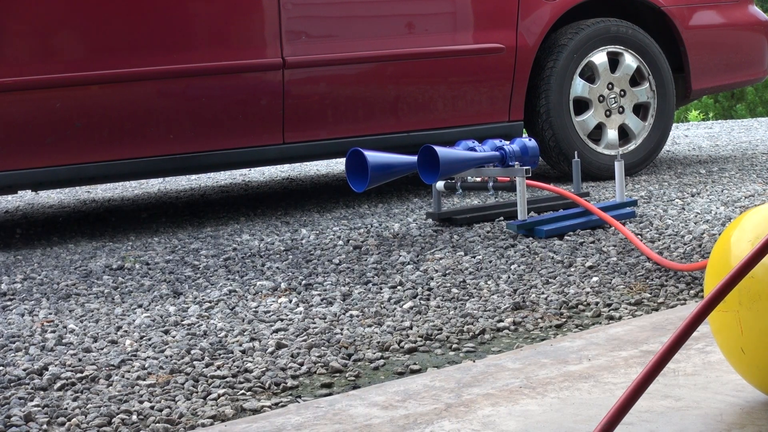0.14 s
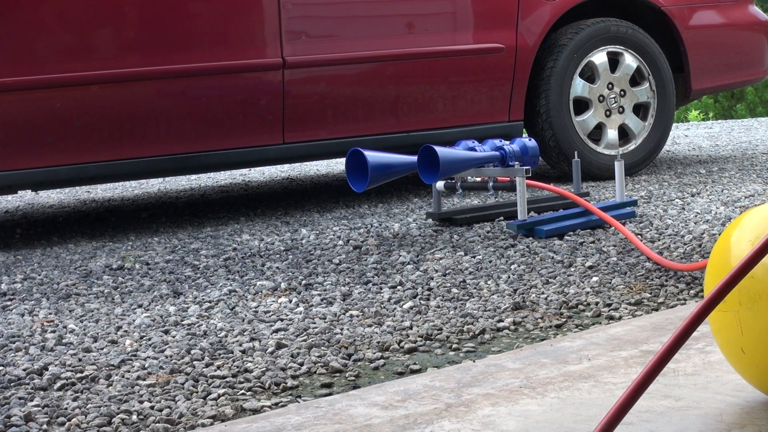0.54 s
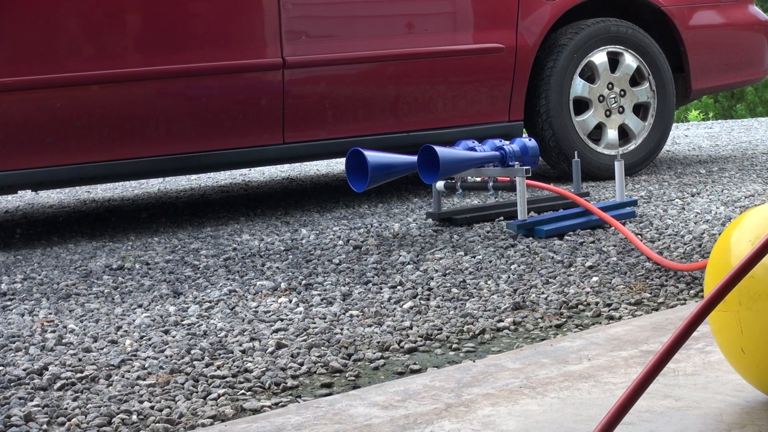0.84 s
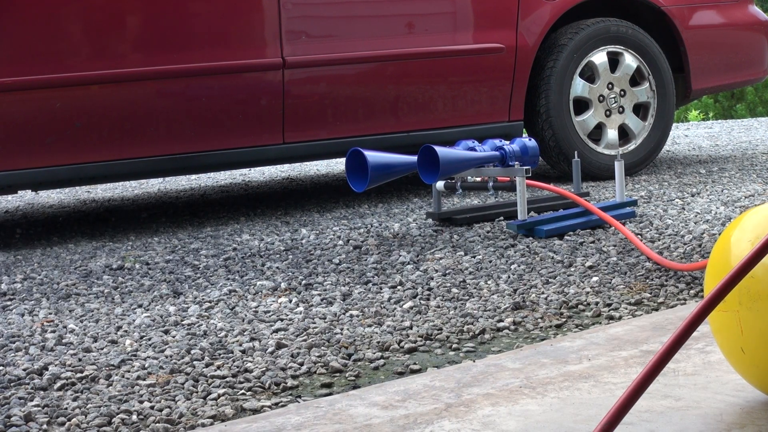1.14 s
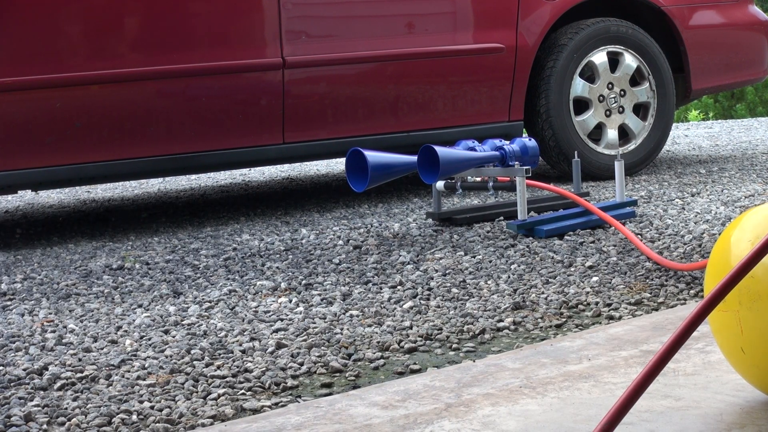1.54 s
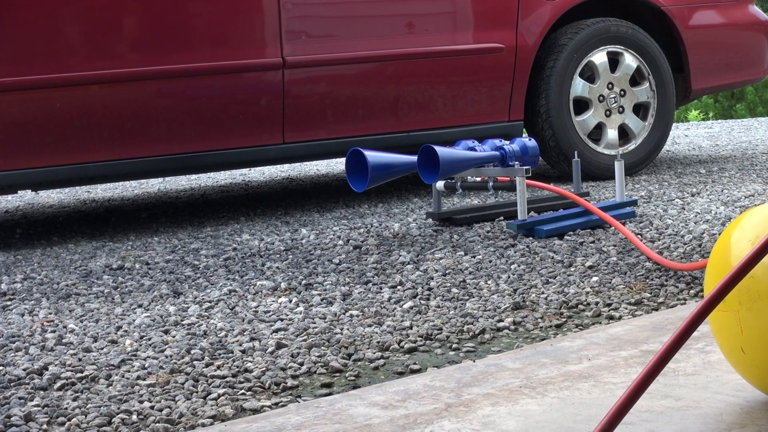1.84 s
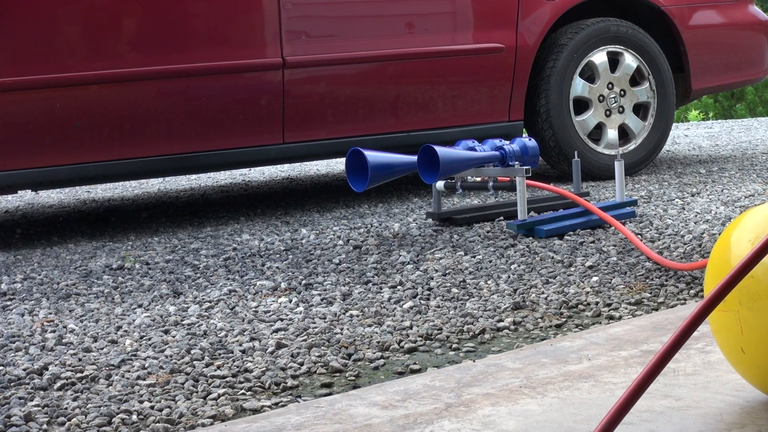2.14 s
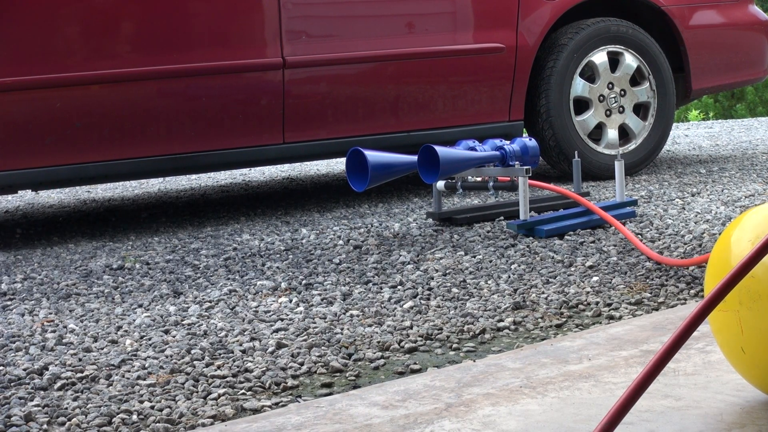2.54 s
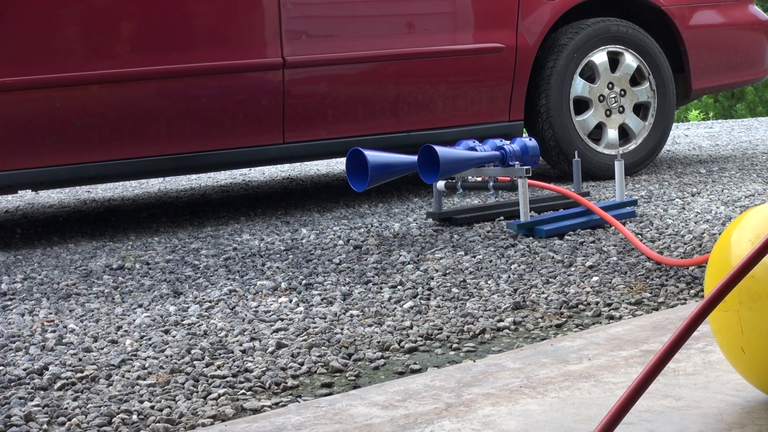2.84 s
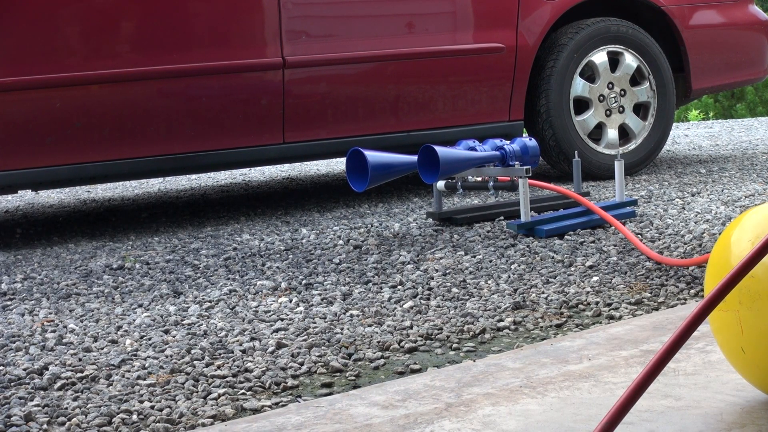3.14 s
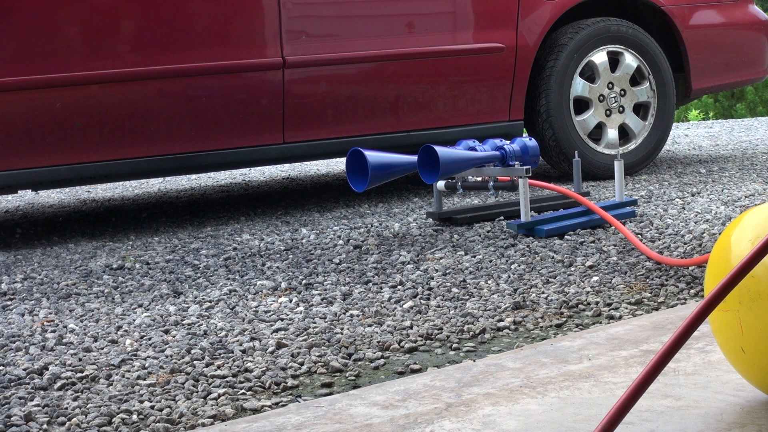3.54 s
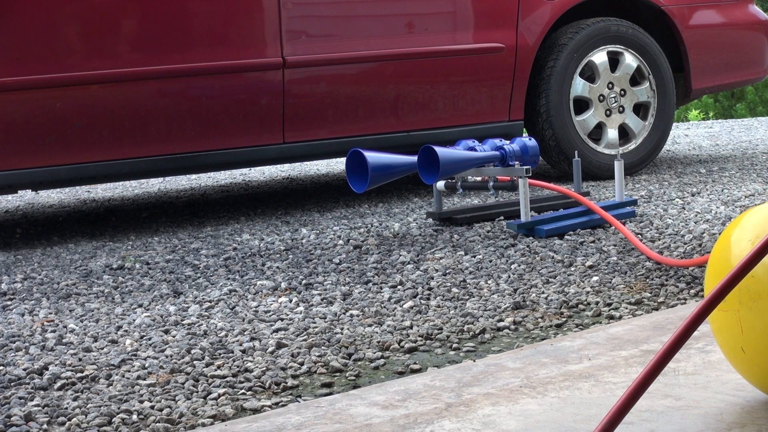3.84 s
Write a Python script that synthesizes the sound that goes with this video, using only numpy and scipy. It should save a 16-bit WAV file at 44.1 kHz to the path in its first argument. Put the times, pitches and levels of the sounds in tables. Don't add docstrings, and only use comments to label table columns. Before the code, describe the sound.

A very loud compressed-air horn bursts out after near silence outdoors, cut off at the end

```python
import sys
import numpy as np
from scipy import signal
from scipy.io import wavfile

SR = 44100
rng = np.random.default_rng(int(sys.argv[2]) if len(sys.argv) > 2 else 0)


def convert_level_to_amplitude(level_db):
    exponent = np.asarray(level_db, float) / 20
    return 10 ** exponent


def store_wav(level_fs):
    pcm = np.round(np.clip(np.atleast_2d(level_fs), -1, 1) * 32767)
    wavfile.write(sys.argv[1], SR, pcm.T.astype(np.int16))


N = 176400


def rms_one(x):
    return x / np.sqrt(np.mean(x ** 2) + 1e-20)


def in_time(rows):
    t_s, *columns = np.transpose(rows)
    return [np.interp(np.arange(N) / SR, t_s, c) for c in columns]


def drift(rate_hz):
    r = np.exp(-80 * np.pi * rate_hz / SR)
    slow = signal.lfilter([1], [1, -2 * r, r * r], rng.standard_normal(N // 40 + 2002))[2000:]
    return np.interp(np.arange(N) / 40, np.arange(len(slow)), rms_one(slow))


def band(x, low_hz, high_hz):
    return signal.sosfilt(signal.butter(2, [low_hz, high_hz], "band", fs=SR, output="sos"), x)


def resonance(x, hz, width_hz):
    r = np.exp(-np.pi * width_hz / SR)
    poles = [1, -2 * r * np.cos(2 * np.pi * hz / SR), r * r]
    return signal.lfilter([(1 - r * r) / 2, 0, (r * r - 1) / 2], poles, x)


def resonant_noise(white, peaks):
    return sum(convert_level_to_amplitude(db) * rms_one(resonance(white, hz, width_hz)) for hz, width_hz, db in peaks)


def coloured(spectrum, patchy_db):
    out = 0
    edges_hz = 23 * 2 ** np.arange(0, 9.7, .5)
    white = rng.standard_normal((2, N))
    hz, db = np.transpose(spectrum)
    for k, (low, high) in enumerate(zip(edges_hz, edges_hz[1:])):
        level_db = np.interp(np.log(low * high) / 2, np.log(hz), db)
        out = out + convert_level_to_amplitude(level_db + patchy_db * drift(8.5)) * band(white[k % 2], low, high)
    return rms_one(out)


# f/Hz, level/dB
TRAFFIC = [(25, -30), (70, -10), (119, -7.5), (210, -12.5), (478, -29), (549, -28), (881, -28.5),
           (985, -33), (4550, -47), (15500, -48)]


def traffic():
    return convert_level_to_amplitude(-56.5) * coloured(TRAFFIC, patchy_db=0.9)


def insect():
    t = np.arange(N) / SR
    beat_hz, swell_db_per_s = 45, 1
    throb = convert_level_to_amplitude(1.5 * drift(4) + swell_db_per_s * t) * (1 + .4 * np.sin(2 * np.pi * beat_hz * t))
    return convert_level_to_amplitude(-83) * throb * rms_one(resonance(rng.standard_normal(N), 4620, 260))


def whine():
    return convert_level_to_amplitude(-97) * np.sin(2 * np.pi * 14200 * np.arange(N) / SR)


# t/s, length/s, level/dB
RUSTLES = [(0.14, 0.093, -68), (0.276, 0.044, -66.5), (0.296, 0.31, -64.5), (0.648, 0.11, -64),
           (0.704, 0.067, -64.5), (0.764, 0.133, -71), (1.175, .03, -73), (1.25, .14, -73)]


def rustles():
    t = np.arange(N) / SR
    grains_per_s = 12000
    hits = rng.random(N) < grains_per_s / SR
    grains = hits * convert_level_to_amplitude(1.84 * rng.exponential(1, N)) * rng.choice([-1, 1], N)
    stroke = 0
    for s, length_s, db in RUSTLES:
        progress = np.clip((t - s) / length_s, 0, .999)
        stroke = stroke + convert_level_to_amplitude(db) * np.sin(np.pi * progress ** 0.76) ** 0.84
    texture = rms_one(band(grains, 1200, 5800)) + convert_level_to_amplitude(-12) * rms_one(band(grains, 5000, 16500))
    return stroke * convert_level_to_amplitude(1.1 * drift(20)) * texture


# t/s, length/s, level/dB, low f/Hz, high f/Hz
PUFFS = [
    (1.195, .03, -57, 260, 520),
    (1.18, .06, -70, 600, 3200),
    (1.912, .06, -49, 180, 620),
    (.283, .012, -70, 3000, 12000),
]


def valve_puffs():
    t, white = np.arange(N) / SR, rng.standard_normal(N)
    out = np.zeros(N)
    for s, length_s, db, low_hz, high_hz in PUFFS:
        swell = np.sin(np.pi * np.clip((t - s) / length_s, 0, 1) ** 0.86)
        out += convert_level_to_amplitude(db) * swell * rms_one(band(white, low_hz, high_hz))
    return out


# t/s, level/dB
BUMPS = [(.34, -51), (.375, -43), (.43, -42)]


def bumps():
    t = np.arange(N) / SR
    out = np.zeros(N)
    for s, db in BUMPS:
        out += convert_level_to_amplitude(db) * np.exp(-((t - s) / 0.017) ** 2) * np.sin(2 * np.pi * 55 * (t - s))
    return out


# t/s, length/s, f/Hz, level/dB
RING_UPS = [(2.068, .018, 655, -30), (2.098, .02, 1400, -34), (2.038, .01, 1150, -39),
            (2.075, .015, 1160, -39), (1.965, .015, 3800, -55), (1.93, .012, 2500, -61),
            (.57, .06, 2500, -80)]


def ring_ups():
    t = np.arange(N) / SR
    out = np.zeros(N)
    for s, length_s, hz, db in RING_UPS:
        out += convert_level_to_amplitude(db) * np.exp(-((t - s) / length_s) ** 2) * np.sin(2 * np.pi * hz * t)
    return out


# f/Hz, level/dB, t60/s
TAP = [(404, -61, .15), (662.5, -63, .25), (1320, -66, .15), (1780, -64, 0.42), (2550, -80.5, .15),
       (3400, -78, 0.1)]


def tap():
    since_s = np.maximum(np.arange(N) / SR - 1.183, 0)
    return sum(convert_level_to_amplitude(db - 60 * since_s / t60_s) * np.sin(2 * np.pi * hz * since_s) for hz, db, t60_s in TAP)


CHIRPS = [1.345, 1.385, 1.43]


def bird():
    t = np.arange(N) / SR
    tweet = sum(np.exp(-((t - s) / .012) ** 2) for s in CHIRPS)
    return convert_level_to_amplitude(-76.5) * tweet * rms_one(band(rng.standard_normal(N), 6550, 7150))


# t/s, level/dB, jet f/Hz
AIR = [(1.908, -85, 3880), (1.922, -53, 3820), (1.98, -47.5, 3700), (2.02, -44.5, 2870),
       (2.07, -34.5, 2860), (2.1, -37, 2640), (2.14, -46, 2600), (2.2, -46, 2600), (3.74, -38, 2600),
       (3.88, -67, 2600)]
# f/Hz, level/dB
AIR_COLOUR = [(250, -28), (380, -4), (540, -14), (700, -27), (1900, -13), (3800, -10), (9000, -16),
              (15500, -14.5)]
# f/Hz, width/Hz, level/dB
PIPES = [(637, 47, 4), (833, 26, 3), (1152, 30, 0.5), (1400, 21, -5), (2040, 82, -1.5)]
# f/Hz, width/Hz, level/dB
LEAKS = [(2500, 150, -11), (3706, 380, -5), (6400, 350, -7)]


def air():
    db, jet_hz = in_time(AIR)
    jet_width_hz = 810
    slow = signal.lfilter(*signal.butter(2, jet_width_hz / SR), rng.standard_normal((2, N)))
    turn = 2 * np.pi * np.cumsum(jet_hz) / SR
    jet = rms_one(slow[0] * np.cos(turn) + slow[1] * np.sin(turn))
    white = rng.standard_normal(N)
    pipes = rms_one(resonant_noise(white, PIPES))
    filled = np.clip((np.arange(N) / SR - 1.99) / 0.011, 0, 1)
    hiss = coloured(AIR_COLOUR, patchy_db=1.5)
    hiss = hiss + (1 - 0.44 * filled) * resonant_noise(white, LEAKS)
    hiss = hiss + filled * (convert_level_to_amplitude(6) * jet + convert_level_to_amplitude(5.5) * pipes)
    return hiss * convert_level_to_amplitude(db) * (np.arange(N) > AIR[0][0] * SR)


def overtone_db(table, k, beyond_db):
    return table[min(k, len(table) - 1)] + beyond_db * max(k - len(table) + 1, 0)


RASP_SHARE_DB = [0, -3, -7.5, -7.5]


def bell(drive, full_db, half_db, rasp_db, beyond_db=0, flutter_db=0.53, count=24):
    mute_db, waver_share, phase_spread_rad = 36.5, 0.000591, 0.75
    hz, db, brass = in_time(drive)
    a = int(drive[0][0] * SR)
    turn = 2 * np.pi * np.cumsum(hz * (1 + waver_share * drift(15.2)))[a:] / SR
    opened = np.clip(2 * brass[a:] - 1, 0, 1)
    muted = np.clip(1 - 2 * brass[a:], 0, 1)
    out = np.zeros(N)
    for k, phase in enumerate(phase_spread_rad * rng.standard_normal(count)):
        level_db = opened * overtone_db(full_db, k, beyond_db)
        level_db = level_db + (1 - opened) * overtone_db(half_db, k, -1.5) - mute_db * muted * (k > 0)
        tone = np.sin((k + 1) * turn + phase) * np.sqrt(2)
        out[a:] += convert_level_to_amplitude(level_db + flutter_db * drift(7.8)[a:]) * tone
    puff_db = -28 + rasp_db - 24.9 * (0.5 - opened) - mute_db * muted
    puff = (1 + np.cos(turn)) ** 3 / 2 * convert_level_to_amplitude(puff_db)
    out[a:] += puff * rms_one(band(rng.standard_normal(N), 670, 7500))[a:]
    return out * convert_level_to_amplitude(db)


# t/s, f/Hz, level/dB, brassiness/0-1
HIGH = [(1.97, 381, -69, .05), (2.03, 371.8, -34, 0.2), (2.095, 377.3, -6.5, 0.24), (2.135, 375.2, 0, 0.33),
        (2.18, 376.5, 8.5, 0.57), (2.385, 375.9, 10, 0.55), (2.42, 376.8, 17.5, 0.9),
        (2.66, 372.9, 17.5, 0.96), (3.7, 372.3, 17.5, 0.97), (3.75, 372.5, 14, 0.55),
        (3.83, 374.3, 9, 0.38), (3.885, 373.8, 0.5, 0.49), (3.92, 368.5, -12, 0.4), (4.0, 370, -52, .8)]
HIGH_FULL_DB = [-0.5, -2, -19, -36, -31, -13.5, -13.5, -7, -10.5, -16.5, -22, -59]
HIGH_HALF_DB = [0, -6, -17.5, -62, -28, -32.5]


def high_bell():
    return bell(HIGH, HIGH_FULL_DB, HIGH_HALF_DB, RASP_SHARE_DB[0])


# t/s, f/Hz, level/dB, brassiness/0-1
LOW = [(2.02, 261.6, -69.5, 0.054), (2.06, 260, -30, .05), (2.1, 260.5, -15, 0.049),
       (2.135, 261.5, -6.5, 0.27), (2.18, 262.3, -4.5, 0.44), (2.385, 261.3, -2.5, 0.45),
       (2.43, 261, 5, 0.89), (3.0, 260.3, 1.5, 1), (3.68, 258.4, 4, 0.93), (3.8, 259.8, -6, 0.63),
       (3.88, 260.2, -24.5, 0.81), (4.0, 255.6, -48, 0.81)]
LOW_FULL_DB = [0.5, 5, 1, 1, -7.5, -3, -1.5, 5.5, -13, -5, -10.5, -3.5, -5, -4.5, -14]
LOW_HALF_DB = [-2.5, 14.5, 7, -3.5, -9.5, -14.5]


def low_bell():
    return bell(LOW, LOW_FULL_DB, LOW_HALF_DB, RASP_SHARE_DB[1])


# delay t/s, level/dB
ECHOES = [(.13, -69), (.19, -37), (.27, -36.5), (.36, -41)]


def echoes(x):
    thin = band(x, 600, 2600)
    return sum(convert_level_to_amplitude(db) * np.pad(thin, (int(s * SR), 0))[:N] for s, db in ECHOES)


# t/s, f/Hz, level/dB, brassiness/0-1
MIDDLE = [(2.4, 320.4, -34, 0.2), (2.47, 320.6, 13.5, 0.71), (2.5, 318.1, 11.5, 1), (2.65, 315.2, 11, 1),
          (3.4, 313.9, 9.5, 0.99), (3.7, 313.1, 13.5, 0.88), (3.78, 310.5, -4, 0.62),
          (3.88, 311, -22.5, 0.47), (3.92, 308.2, -16.5, 0.71), (4.0, 316.4, -25, 0.58)]
MIDDLE_FULL_DB = [0, -19, 0.5, -9.5, -11.5, -22, -6.5, -3.5, -21, -11, -16, -28]
MIDDLE_HALF_DB = [1, -3, -18.5, -4, -16, -24]


def middle_bell():
    return bell(MIDDLE, MIDDLE_FULL_DB, MIDDLE_HALF_DB, RASP_SHARE_DB[2])


# t/s, f/Hz, level/dB, brassiness/0-1
LAST = [(3.62, 258, -21.5, 0.7), (3.72, 258.6, 2, 0.39), (3.85, 257.3, -16.5, 1), (3.915, 258.3, -21, 0.92),
        (3.95, 259.3, -17, 0.96), (3.98, 258, -18, 0.93), (4.0, 260, -20, 0.85)]
LAST_FULL_DB = [0, -9, 1, 6.5, -4, -10, -4, -21, -18, -14, -19, -23]


def emptying_bell():
    return bell(LAST, LAST_FULL_DB, LOW_HALF_DB, RASP_SHARE_DB[3], beyond_db=-1.05, flutter_db=4.5, count=50)


def scene():
    horn = high_bell() + low_bell() + middle_bell()
    mid = horn + echoes(horn) + emptying_bell() + air()
    mid = mid + traffic() + insect() + rustles() + bird() + bumps() + tap()
    mid = mid + valve_puffs() + ring_ups() + whine()
    return np.array([mid, mid])


def roll_off(x):
    return signal.sosfilt(signal.butter(12, 15730, fs=SR, output="sos"), x)


# t/s, level/dB
GAIN = [(2.09, -0.4), (2.12, -4.5), (2.14, -10), (2.2, -16), (2.3, -13.5), (3.88, -14), (4.0, -5.5)]


def record(dry):
    overload, knee = 1.8, 81
    x = (dry + convert_level_to_amplitude(-80) * rng.standard_normal(N)) / overload
    x = x + 0.36 * band(np.maximum(np.abs(x) - 1, 0), 40.2, 220)
    x = x / (1 + np.abs(x) ** knee) ** (1 / knee)
    x = overload * (x + 0.055 * x ** 2)
    x = signal.lfilter(*signal.butter(1, 48, "high", fs=SR), x) * convert_level_to_amplitude(in_time(GAIN)[0])
    x = x + convert_level_to_amplitude(-2) * band(x, 50, 102)
    x = x + (convert_level_to_amplitude(-4.5) - 1) * signal.lfilter(*signal.butter(1, 6000, "high", fs=SR), x)
    x = x / (1 + np.abs(x / .86) ** 8) ** (1 / 8)
    x = x + convert_level_to_amplitude(-45.5) * band(x, 150, 2030) * [[-1], [1]]
    x = x * np.clip(np.arange(N, 0, -1) / 40, 0, 1)
    return roll_off(x)


dry = scene()
out = record(dry)
store_wav(out)
```